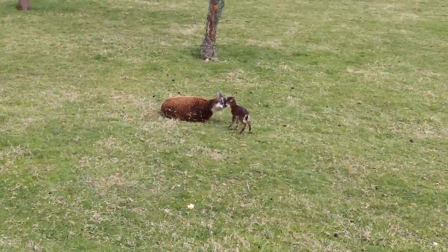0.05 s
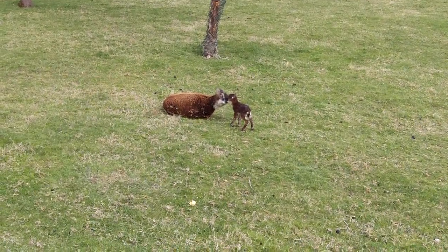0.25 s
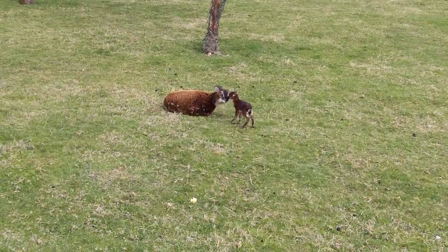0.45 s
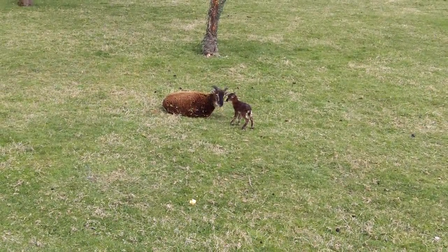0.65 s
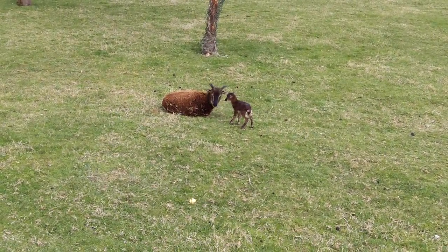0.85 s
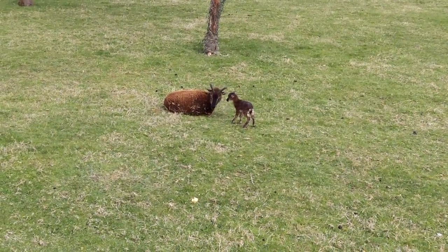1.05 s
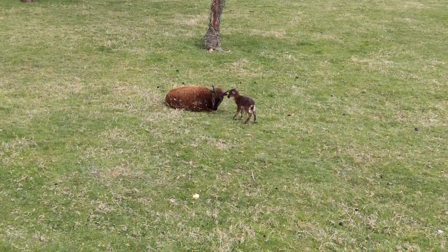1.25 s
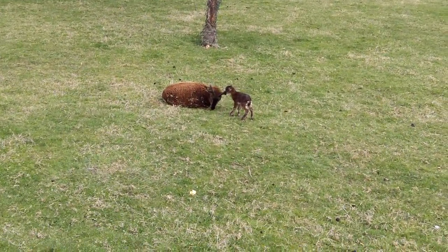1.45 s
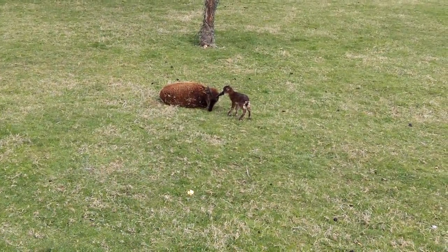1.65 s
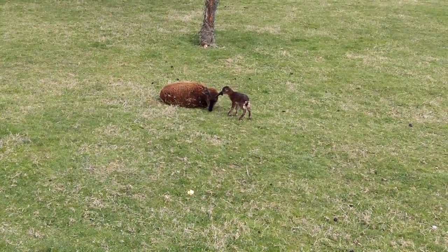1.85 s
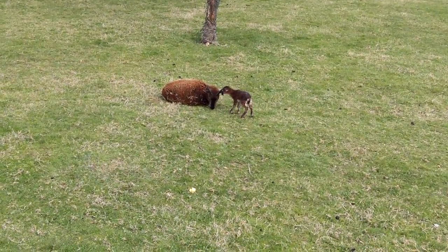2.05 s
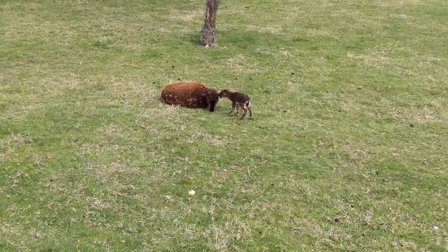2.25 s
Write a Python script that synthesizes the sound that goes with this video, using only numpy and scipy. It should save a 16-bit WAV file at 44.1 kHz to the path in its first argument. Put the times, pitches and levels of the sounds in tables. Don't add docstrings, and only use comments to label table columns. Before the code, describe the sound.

A lamb gives three soft, falling whining calls close by in a breezy open meadow

```python
import sys
import numpy as np
from scipy import signal
from scipy.fft import rfft, irfft, next_fast_len
from scipy.io import wavfile
from scipy.ndimage import uniform_filter1d, map_coordinates

SR = 44100
rng = np.random.default_rng(int(sys.argv[2]) if len(sys.argv) > 2 else 0)


def volts(x):
    e = np.asarray(x, float) / 20
    return 10 ** e


def to_wav(sig):
    pcm = np.clip(np.atleast_2d(sig), -1, 1) * 32767
    pcm = np.round(pcm).astype(np.int16)
    wavfile.write(sys.argv[1], SR, pcm.T)


N = 101429


def unit(x):
    return x / np.sqrt(np.mean(x ** 2) + 1e-20)


def along(points, hz):
    f, v = np.transpose(points)
    return np.interp(np.log(hz + 1), np.log(f + 1), v)


def curves(rows):
    s, *columns = np.transpose(rows)
    t = np.arange(N) / SR
    inside = (t >= s[0]) & (t <= s[-1])
    gate = uniform_filter1d(inside * 1., size=132)
    return [uniform_filter1d(np.interp(t, s, c), size=132) for c in columns] + [gate]


def wobble(rate):
    knots = rng.standard_normal(int(N * rate / SR) + 4)
    return map_coordinates(knots, [np.arange(N) * rate / SR])


def filtered(x, response):
    m = next_fast_len(N + SR // 2)
    hz = np.fft.rfftfreq(m, 1 / SR)
    return irfft(rfft(x, m) * response(hz), m)[..., :N]


def rush(spectrum, patchy_db):
    z = signal.stft(rng.standard_normal(N), nperseg=512)[2]
    field = uniform_filter1d(rng.standard_normal(z.shape), size=6, axis=0)
    field = uniform_filter1d(field, size=8, axis=1)
    x = signal.istft(z * volts(patchy_db * unit(field)), nperseg=512)[1][:N]
    return unit(filtered(x, lambda hz: volts(along(spectrum, hz))))


def turns(hz):
    return 2 * np.pi * np.cumsum(hz) / SR


def whine(overtones, *notes):
    quiver_hz, quiver_db, breath_db = 2.5, .15, -32
    hz, db, second_db, gate = curves(sum(notes, []))
    phase = turns(hz + quiver_hz * wobble(70))
    cap_db, cut_hz, *under_db = overtones
    upper = 0
    for order, under in enumerate(under_db, start=3):
        level = volts(np.minimum(second_db, cap_db) + under + 1.4 * wobble(45))
        throat = 1 / (1 + (order * hz / cut_hz) ** 12)
        upper = upper + level * throat * np.sin(order * phase)
    breath = 1 + volts(breath_db) * wobble(900)
    tone = volts(db + quiver_db * wobble(90)) * breath * np.sin(phase)
    second = volts(second_db + 1.3 * wobble(90)) * np.sin(2 * phase)
    return np.sqrt(2) * gate * (tone + second + upper)


def first_call():
    overtones = [-42, 7000, -14, -28, -34]
    # time in seconds, pitch in Hz, level in dB, second harmonic in dB.
    tail_note = [(0, 858, -31.5, -61), (.012, 798, -52.5, -59), (.03, 800, -60, -83.5)]
    high_note = [(.226, 1159, -50.5, -79), (.234, 1138, -36, -73), (.242, 1161, -20, -43),
                 (.248, 1192, -17.5, -41.5), (0.276, 1178, -17.5, -41.5), (.293, 1128, -19.5, -39.5),
                 (0.304, 1070, -23, -46), (.319, 976.4, -23.5, -49.5), (0.331, 799, -32.5, -55)]
    low_note = [(.333, 785, -32, -62), (.344, 762, -20, -58), (.367, 742, -23, -60), (.405, 696, -28, -64),
                (.423, 692, -28, -66), (.447, 665, -34, -68), (.462, 645, -54, -72)]
    return whine(overtones, tail_note), whine(overtones, high_note, low_note)


def whistle():
    # time in seconds, pitch in Hz, level in dB.
    opening = [(0, 7370, -53), (.03, 7340, -50), (.052, 7160, -44.5), (.068, 7160, -49), (.085, 7190, -62),
               (.12, 6830, -66), (.18, 6870, -56.5), (.21, 6780, -56), (.255, 6950, -74.5)]
    sinking = [(.29, 6720, -87), (0.319, 6730, -59.5), (.35, 6250, -64.5), (.39, 5750, -65)]
    level_pipe = [(.388, 6020, -65), (.4, 6010, -45), (.44, 6080, -52.5), (0.46, 6160, -45),
                  (.47, 6100, -73), (.51, 6096, -73)]
    under_pipe = [(.4, 5240, -72), (.446, 5430, -53.5), (.462, 5600, -69)]
    faint_pipe = [(.22, 5700, -74), (.245, 5640, -64), (.27, 5600, -68), (.29, 5620, -64), (.33, 5750, -70)]
    returning = [(.74, 7000, -70), (.775, 7170, -61), (.82, 6900, -69), (0.949, 7150, -71)]
    falling = [(.95, 7100, -72), (1.04, 6730, -59), (1.08, 6350, -70), (1.15, 6300, -71),
               (1.185, 6320, -59), (1.21, 6230, -72)]
    late_pipe = [(2.1, 1880, -70), (2.13, 1862, -60), (2.19, 1880, -61), (2.25, 1925, -60),
                 (2.29, 1915, -70)]
    # centre in seconds, pitch in Hz, peak in dB, half length in seconds.
    chirps = [
        (1.113, 4400, -58, .008),
        (1.655, 7400, -60, .015),
        (2.096, 5620, -55, .005),
        (.467, 5850, -56, .005),
        (1.878, 2720, -46, .005),
        (.012, 9260, -64, .014),
        (1.82, 3700, -50, .007),
        (.434, 10500, -56, .003),
        (.434, 9200, -58, .003),
    ]
    out, t = np.zeros(N), np.arange(N) / SR
    tracks = [opening, sinking, level_pipe, under_pipe, faint_pipe, returning, falling, late_pipe]
    for number, rows in enumerate(tracks):
        hz, db, gate = curves(rows)
        phase = turns(hz * (1 + .002 * wobble(54)))
        tone = volts(db + 2.2 * wobble(79.1)) * np.sin(phase)
        if number == 0:
            tone += volts(-83 + 3 * wobble(30)) * np.sin(2 * phase)
        out += np.sqrt(2) * gate * tone
    for s, hz, db, half in chirps:
        out += volts(db) * np.exp(-((t - s) / half) ** 2) * np.sin(2 * np.pi * hz * t)
    return out


def wind():
    # frequency in Hz, level in dB per Hz.
    meadow = [(25, -55), (250, -10), (600, -4.5), (1300, -1.5), (2200, -11), (4000, -20.5), (9000, -27),
              (15500, -40)]
    # time in seconds, gain in dB.
    breeze = [(0, 3), (.5, 1), (1, -0.9), (1.3, -1.5), (1.6, -0.96), (2, 0.6), (2.3, -2.6)]
    # start in seconds, peak in dB.
    thuds = [(0.0, -56.5), (0.164, -57), (0.49, -46), (0.715, -53), (0.779, -55), (0.829, -54.5),
             (1.024, -52), (1.089, -56), (1.125, -64), (1.155, -59), (1.239, -55), (1.292, -48.5),
             (1.453, -56), (1.81, -60)]
    thud_hz, thud_s, thud_db, buffet_db = 122.4, 0.017, -5, -73.5
    hum_db = -49.5 + curves(breeze)[0] + 0.45 * wobble(1.22) + 0.34 * wobble(8.4)
    hum = volts(hum_db) * rush(meadow, patchy_db=1.1)
    t = np.arange(N) / SR
    puffs = sum(volts(db + thud_db) * np.exp(-((t - s - thud_s) / thud_s) ** 2) for s, db in thuds)
    low = filtered(rng.standard_normal(N), lambda hz: np.exp(-np.log((hz + 1) / thud_hz) ** 2 / 1.97))
    return hum + (puffs + volts(buffet_db + 1.9 * wobble(20))) * unit(low)


def line_tone():
    line_hz, line_db = 7867.13, -56.5
    flips_per_s, first_flip_s, sharpness = 59.94, .0069, 8.6
    t = np.arange(N) / SR
    flips = np.tanh(sharpness * np.sin(np.pi * flips_per_s * (t - first_flip_s)))
    return volts(line_db) * np.sqrt(2) * flips * np.sin(2 * np.pi * line_hz * t)


def field_echo(x):
    t60_s, delay_s, top_hz = 1.3, .02, 1700
    t = np.arange(SR) / SR
    tail = rng.standard_normal(SR) * volts(-60 * t / t60_s) * (t > delay_s)
    answer = signal.fftconvolve(x, tail / np.linalg.norm(tail))[:N]
    return filtered(answer, lambda hz: 1 / (1 + (hz / top_hz) ** 4))


def grass():
    # frequency in Hz, level in dB per Hz.
    blades = [(1500, -31), (2500, 5.5), (4000, 5), (7000, 5), (10000, -4.5), (13000, -11), (15500, -17.5)]
    # start in seconds, length in seconds, level in dB.
    swells = [
        (0.781, 0.087, -57.5),
        (0.98, 0.106, -62),
        (1.208, .09, -56),
        (1.37, .05, -61.5),
        (1.633, 0.52, -55.5),
        (1.786, 0.228, -63),
    ]
    # time in seconds, peak in dB, low part relative to it in
    # dB.
    stalk_ticks = [(0.162, -56.5, 9), (0.192, -56, -15), (0.387, -63, -17), (0.4326, -56, -20),
                   (0.6478, -55.5, 0), (0.6693, -51, 0), (0.788, -56.5, 16), (0.803, -51, 11),
                   (0.8943, -50, 4.5), (1.2106, -45, -12), (1.282, -47, 3.5), (1.3208, -52.5, -2),
                   (1.481, -50.5, 5.5), (1.561, -52.5, 12), (1.819, -49, -8),
                   (.679, -57, -5), (.78, -60, 10), (.8394, -58, 4), (.8683, -58, -4), (1.0011, -58, -8),
                   (1.0216, -57, -8), (1.1583, -59, -8), (1.231, -57, -10), (1.459, -58, -8),
                   (1.568, -56, -8), (1.58, -57, -8), (1.6252, -58, -8)]
    now = np.arange(N) / SR
    boxes = sum(volts(db) * ((now > s) & (now < s + length)) for s, length, db in swells)
    swell = uniform_filter1d(boxes, size=round(0.054 * SR))
    crackle_db = 3.5 / (1 + 2 * (now > 1.75))
    rustle = swell * volts(crackle_db * wobble(300)) * rush(blades, patchy_db=1.5)

    high, low, t = np.zeros(N + SR), np.zeros(N + SR), np.arange(400) / SR
    for s, peak_db, low_db in stalk_ticks:
        snap, body = rng.standard_normal((2, len(t)))
        start = round(s * SR)
        high[start:][:len(t)] += volts(peak_db + 6.5 - 60 * t / 0.0051) * snap
        low[start:][:len(t)] += volts(peak_db + low_db + 7.0 - 60 * t / 0.016) * body

    def bell(centre_hz, spread):
        return lambda hz: np.exp(-(np.log(hz + 1) - np.log(centre_hz)) ** 2 / spread)

    return rustle + filtered(high[:N], bell(9500, .13)) + filtered(low[:N], bell(3200, 0.76))


def second_call():
    overtones = [-58, 7000, 0, -20, -25]
    # time in seconds, pitch in Hz, level in dB, second harmonic in dB.
    note = [(1.18, 803, -61, -72), (1.188, 801, -39.5, -70), (1.198, 838, -26.5, -71),
            (1.211, 812.5, -27.5, -60), (1.222, 731, -28, -47), (1.234, 688, -32, -59),
            (1.264, 642, -32.5, -55), (1.277, 622, -35.5, -69), (1.291, 633, -48, -72)]
    return whine(overtones, note)


def snuffle():
    # time in seconds, level in dB.
    breath = [(1.66, -72), (1.685, -55.5), (1.72, -47), (1.75, -51), (1.8, -51)]
    # frequency in Hz, width in Hz, level in dB.
    resonances = [(1550, 500, -4), (2600, 550, 0)]
    # centre in seconds, peak in dB.
    snort_rows = [
        (1.637, -48),
        (1.684, -42),
        (1.697, -42),
        (1.714, -46),
        (1.724, -46),
        (1.735, -43),
    ]

    def nose(f):
        total = 0
        for k, (c, w, d) in enumerate(resonances):
            total = total + (-1) ** k * volts(d) * 1j * f * w / (c * c - f * f + 1j * f * w)
        return total / (1 + (f / 4000) ** 3)

    t = np.arange(N) / SR
    db, gate = curves(breath)
    snorts = sum(volts(d) * np.exp(-((t - s) / .005) ** 2) for s, d in snort_rows)
    grains = volts(2.5 * wobble(500)) * rng.standard_normal(N)
    air = unit(filtered(grains, nose))
    return (gate * volts(db + 1.0 * wobble(80)) + snorts / 2) * air


def third_call():
    overtones = [-44, 7000, -24, -32, -35]
    turned_overtones = [-44, 3100, -14, -13, -30]
    # time in seconds, pitch in Hz, level in dB, second harmonic in dB.
    high_note = [(1.746, 1273, -46, -64), (1.755, 1278, -35, -47), (1.766, 1285, -32.5, -43.5),
                 (1.792, 1274, -33.5, -42.5), (1.803, 1250, -39, -43.5), (1.814, 1264, -61, -48)]
    linger = [(1.811, 1275, -52, -75), (1.82, 1266, -39, -70), (1.84, 1262, -41, -70),
              (1.855, 1270, -50, -75), (1.875, 1270, -58, -80)]
    glide = [(1.815, 1217, -55, -51), (1.827, 1170, -37, -40), (1.837, 1141, -28, -44.5),
             (1.848, 1081, -30, -43), (1.858, 1045, -29.5, -63), (1.876, 910.3, -17, -54),
             (1.883, 819, -18, -37), (1.889, 758.7, -23, -38.5), (1.91, 746, -22, -42.5)]
    low_note = [(1.91, 741, -24, -38.5), (1.94, 712, -27.5, -58), (1.957, 754.4, -29, -44.5),
                (2.0, 727.6, -31, -45), (2.021, 725.8, -28.5, -46), (2.052, 698.3, -31.5, -47),
                (2.069, 698, -34, -56), (2.083, 683, -36, -76), (2.092, 710, -54, -74)]
    away = whine(overtones, high_note)
    turned = whine(overtones, linger) + whine(turned_overtones, glide, low_note)
    return away, turned


def far_sheep():
    # time in seconds, pitch in Hz, level in dB.
    bleat = [(1.98, 500, -72), (2.02, 499, -62), (2.13, 494, -61), (2.2, 485, -61), (2.3, 483, -62)]
    # multiple of the pitch, level in dB.
    orders = [(1, -2), (1.5, 1), (3, -7), (4, -8), (5, -4), (6, -5)]
    hz, db, gate = curves(bleat)
    phase = turns(hz + 2.54 * wobble(25))
    return gate * sum(volts(db + d + 0.58 * wobble(26.3)) * np.sin(k * phase) for k, d in orders)


def scene():
    lean_db = .2
    tail, first = first_call()
    soft = tail + second_call()
    away, turned = third_call()
    echo = field_echo(volts(-30) * (first + soft) + volts(-11) * away + volts(-20) * turned)
    leaning = (first + away + turned + echo) * volts([[-lean_db], [lean_db]])
    return leaning + soft + whistle() + wind() + grass() + snuffle() + far_sheep()


def band_limit(x):
    return signal.sosfilt(signal.butter(12, 15670, fs=SR, output="sos"), x)


def record(dry):
    # frequency in Hz, level in dB per Hz.
    side_colour = [(120, -48.5), (400, -7), (1200, -11), (3000, -7), (9000, -14), (12000, -9),
                   (15500, -12.5)]
    side = volts(-74) * rush(side_colour, patchy_db=-3.0)
    mix = dry + line_tone() + np.array([side, -side])
    mix = filtered(mix, lambda hz: hz < 15380)
    return band_limit(mix)


dry = scene()
out = record(dry)
to_wav(out)
```